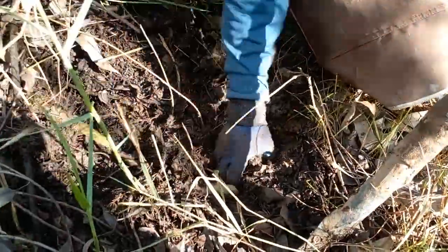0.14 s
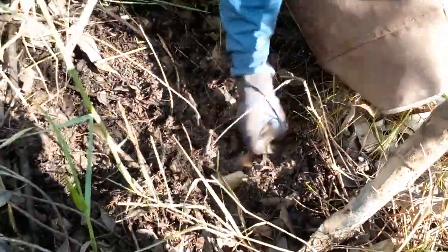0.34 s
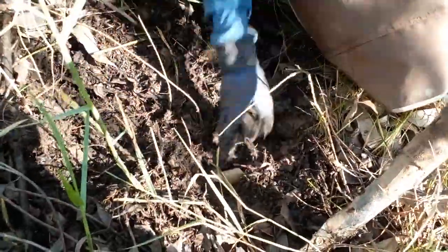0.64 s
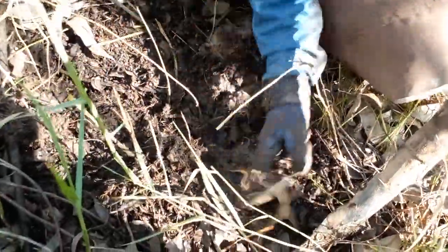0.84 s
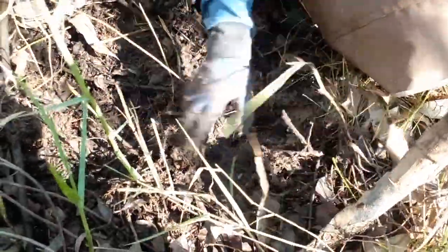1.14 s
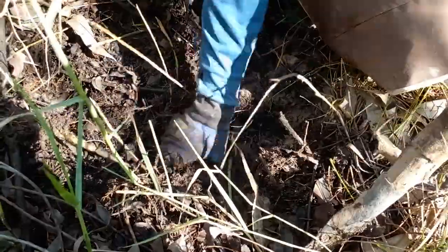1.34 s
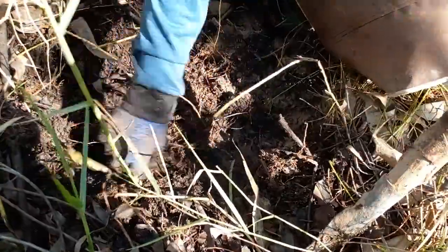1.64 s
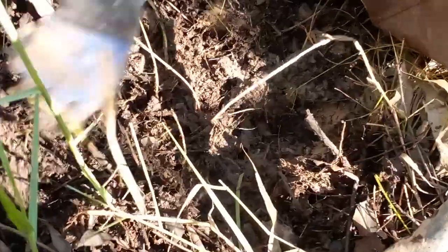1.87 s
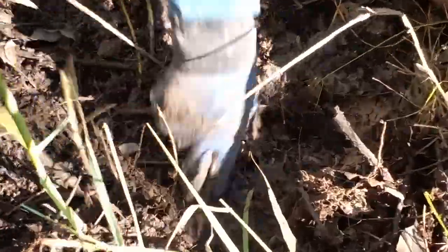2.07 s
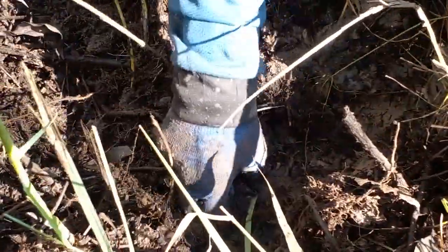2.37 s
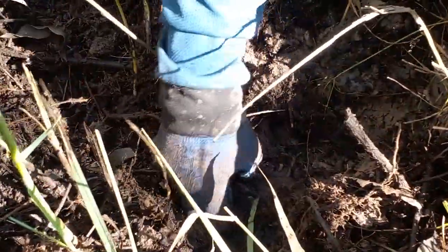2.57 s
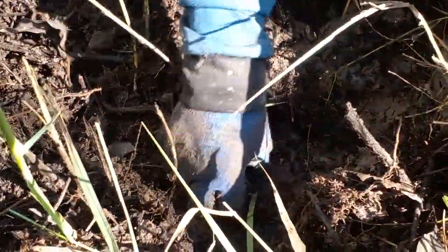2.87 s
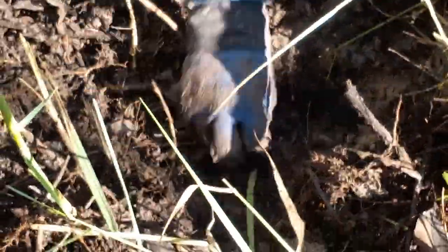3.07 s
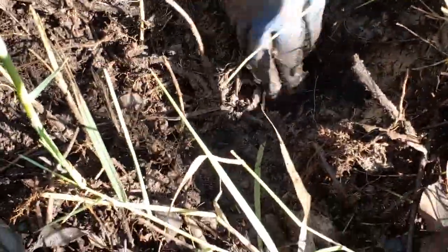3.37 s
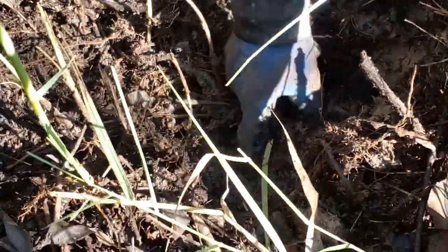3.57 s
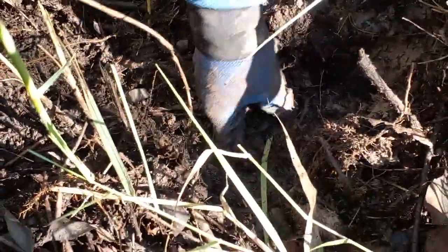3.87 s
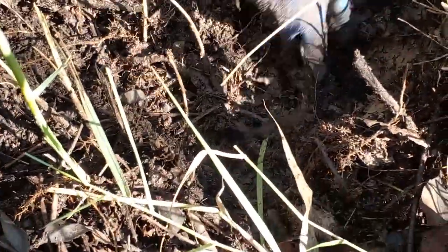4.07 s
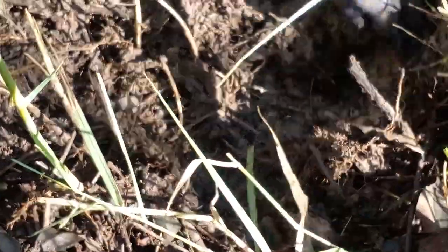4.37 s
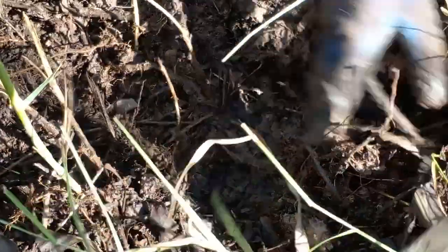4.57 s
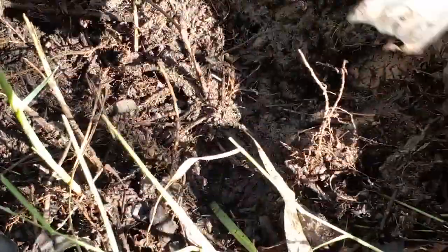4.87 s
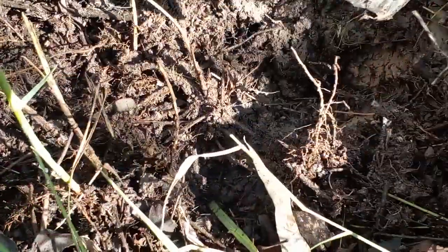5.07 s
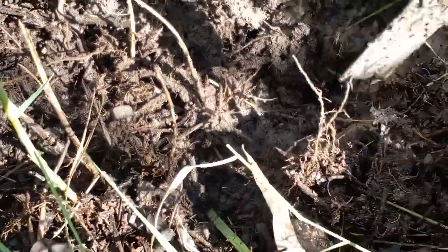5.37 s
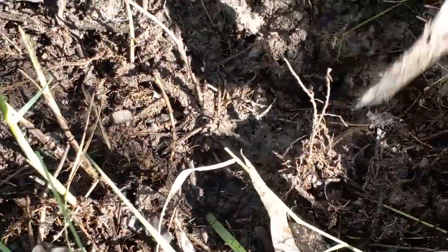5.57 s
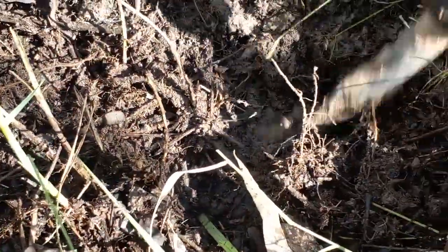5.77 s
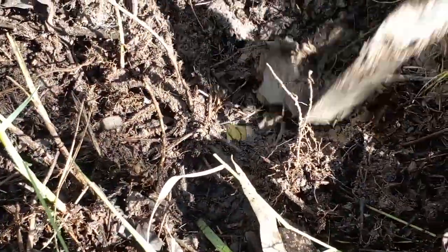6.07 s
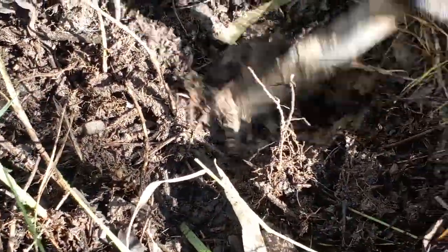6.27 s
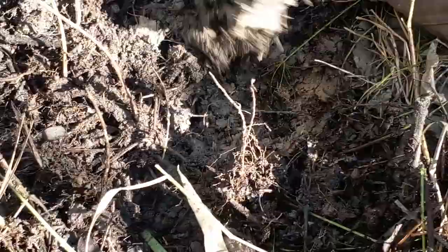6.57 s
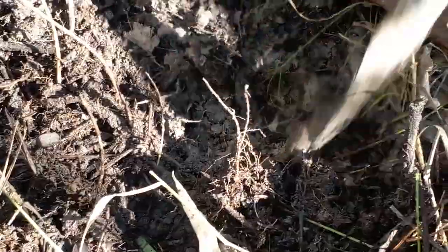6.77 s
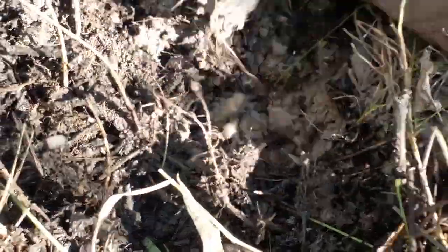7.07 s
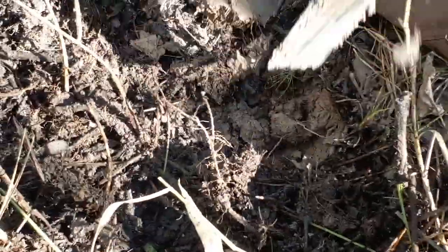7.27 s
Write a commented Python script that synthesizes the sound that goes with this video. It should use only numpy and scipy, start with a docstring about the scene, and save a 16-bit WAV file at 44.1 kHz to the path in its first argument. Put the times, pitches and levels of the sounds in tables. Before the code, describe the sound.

Close gloved digging in dry woodland ground: crunchy rustles, a quiet lull, then harder scraping, twig snaps and dull blade knocks.

```python
"""Dry woodland floor, close up: a gloved hand and a blade dig, with crackling litter, snaps and thuds.
Strokes are noise and dense tiny rings, swelling with effort; snaps are bursts with short modes.
Thuds are decaying low sines with uneven pitch; the blade rings in heavily damped modes.
Behind: a rising bird whistle (swept sine with diffuse tails), shrill insects (wandering sines),
a short low hum (gliding sine with a weak octave) and faint open air (shaped noise)."""
import sys
import numpy as np
from scipy import signal
from scipy.fft import rfft, irfft, next_fast_len
from scipy.io import wavfile
from scipy.ndimage import map_coordinates

SR = 44100
rng = np.random.default_rng(int(sys.argv[2]) if len(sys.argv) > 2 else 0)


def dump_mix(stems):
    """Bounce the given channels to the path in sys.argv[1] as a 16-bit WAV at rate SR."""
    frames = np.atleast_2d(stems).T  # one column per channel
    limited = np.clip(frames, -1, 1)  # hard clip at full scale
    pcm = np.round(limited * 32767).astype(np.int16)
    wavfile.write(sys.argv[1], SR, pcm)


N = 327663

# relative spectrum of soil sounds: freq_hz, density_db_per_hz
SOIL_SPECTRUM = [(100, -23), (250, -17.5), (400, -15.5), (620, -3), (900, -2), (1300, 2), (2200, 2.5),
                 (3000, -1.5), (4500, 4), (9000, -39)]


def amp(db):
    """Decibels to gain."""
    return 10 ** (np.asarray(db) / 20)


def unit(x):
    """Scale x to rms 1."""
    return x / np.sqrt(np.mean(x ** 2) + 1e-20)


def gain(points, hz):
    """Gain of a (Hz, dB) spectrum, interpolated on a log frequency axis."""
    point_hz, point_db = np.transpose(points)
    return amp(np.interp(np.log(hz + 1), np.log(point_hz), point_db))


def wobble(rate):
    """Smooth random curve, rate knots per second."""
    knots = rng.standard_normal(4096)
    return map_coordinates(knots, [np.arange(N) * rate / SR], mode="wrap")


def filtered(x, response):
    """Zero-phase filter: spectrum of x times response(hz)."""
    size = next_fast_len(N + SR // 4)
    return irfft(rfft(x, size) * response(np.fft.rfftfreq(size, 1 / SR)), size)[:N]


def coloured(x, points, size=2048):
    """Minimum-phase filter of unit energy with the given spectrum."""
    cepstrum = irfft(np.log(gain(points, np.fft.rfftfreq(size, 1 / SR))))
    # fold the cepstrum to make the filter causal
    cepstrum[1:size // 2] *= 2
    cepstrum[size // 2 + 1:] = 0
    pulse = irfft(np.exp(rfft(cepstrum)))
    return signal.oaconvolve(x, pulse / np.linalg.norm(pulse))[:N]


def fade(t, t60):
    """Exponential decay, 60 dB down after t60 seconds."""
    return np.exp(-np.log(1000) * t / t60)


def add(track, start_s, sound):
    """Mix a sound into a track from start_s."""
    part = track[max(round(start_s * SR), 0):][:len(sound)]
    part += sound[:len(part)]


def scattered(x, t60, count=4):
    """Diffuse reflections: decaying noise tails whose shares drift."""
    t = np.arange(SR // 3) / SR
    envelope = fade(t, t60) * (1 - fade(t, t60 / 10))
    tails = rng.standard_normal((count, len(t))) * envelope
    tails /= np.linalg.norm(tails, axis=1, keepdims=True)
    shares = np.array([wobble(rate=7) for _ in tails])
    shares /= np.linalg.norm(shares, axis=0)
    reflections = signal.oaconvolve(x[None], tails, axes=1)[:, :N]
    return np.sum(shares * reflections, axis=0)


def woodland():
    """Open air: noise with a faint rumble and hiss, drifting slightly in level."""
    # relative air spectrum: freq_hz, density_db_per_hz
    air_spectrum = [(20, -36), (35, -9), (60, 1), (100, -4), (160, -10), (300, -17), (700, -21.5),
                    (1500, -19), (3000, -19), (5000, -16), (7500, -17.5), (12500, -11), (15500, -19)]
    air = unit(filtered(rng.standard_normal(N), lambda hz: gain(air_spectrum, hz)))
    return amp(-68.0 + 0.29 * wobble(rate=3.52)) * air


def insects():
    """Distant insects: unevenly pulsing sines, each wandering about its own pitch."""
    # one row per insect voice: pitch_hz (centre), level_db
    voices = [(8050, -79.5), (8330, -70), (8480, -75.5), (8700, -89)]
    chorus = np.zeros(N)
    for pitch_hz, level_db in voices:
        hz = pitch_hz + 65 * wobble(rate=20) + 130 * wobble(rate=700)
        pulses = unit(amp(3.5 * wobble(rate=45) + 2 * wobble(rate=12)))
        tone = unit(np.sin(2 * np.pi * np.cumsum(hz) / SR))
        chorus += amp(level_db) * pulses * tone
    return chorus


def effort():
    """Litter dB, soil dB and lumpiness: strokes swell, peak and let go over a faint trickle."""
    # pushes through the ground; levels before the trims in strokes():
    # peak_s, rise_s, release_s, litter_db, soil_db, lumpiness (0 slides, 1 crumbles)
    pushes = [(.06, 0.3, 0.12, -49, -60, 0.72), (.275, 0.068, 0.18, -58, -66.5, 1),
              (0.429, 0.018, 0.035, -54.5, -63, 0.91), (.495, 0.042, 0.038, -53.5, -66.5, .5),
              (0.727, 0.019, 0.026, -52, -65, .8), (0.777, 0.023, .018, -47.5, -54.5, 1),
              (0.834, 0.045, .03, -49.5, -51.5, 1), (.885, 0.045, 0.047, -40, -52.5, 0.88),
              (.942, 0.051, 0.051, -37, -49.5, 0.76), (1.027, 0.02, 0.014, -37, -53, 0.69),
              (1.06, .02, 0.051, -53.5, -63.5, 0.85), (1.165, 0.051, 0.091, -54, -67, 0.92),
              (1.33, 0.091, 0.11, -61, -69, 0.75), (1.46, 0.083, 0.13, -58, -64.5, 0.92),
              (1.72, 0.094, 0.19, -59, -69.5, 0.67), (2.01, 0.09, .06, -64, -90, 0.95),
              (2.17, 0.08, 0.1, -59.5, -72.5, 0.4), (2.39, 0.029, 0.072, -59, -76, 0.98),
              (2.56, .05, 0.046, -58.5, -68, .8), (2.73, .12, 0.13, -64.5, -78, 0.72),
              (3.14, 0.1, 0.082, -66, -75, 0.86), (3.29, 0.028, 0.028, -67, -68.5, 1),
              (3.335, 0.019, 0.062, -61, -73, 0.65), (3.56, 0.051, 0.045, -71, -88, 0.88),
              (3.83, 0.088, 0.094, -58.5, -76, 0.96), (3.999, 0.063, 0.072, -60, -78.5, .6),
              (4.357, 0.075, 0.029, -42.5, -51, 0.18), (4.454, 0.024, 0.044, -43.5, -55, 0.28),
              (4.51, 0.031, 0.031, -40.5, -56, 0.55), (4.57, 0.063, .06, -55.5, -61.5, 0.45),
              (4.717, 0.049, .04, -30.5, -41.5, 0.37), (4.87, 0.1, 0.12, -44.5, -58.5, 0.54),
              (5.037, 0.16, 0.11, -39, -49, 0.66), (5.285, 0.02, 0.042, -52.5, -56, 1),
              (5.442, 0.15, 0.11, -46.5, -56, 0.33), (5.646, 0.022, 0.094, -47.5, -56.5, 0.68),
              (5.78, 0.026, .07, -56.5, -65, 0.41), (5.852, 0.008, 0.076, -50, -62.5, 0.65),
              (5.934, 0.011, 0.011, -48.5, -61, .7), (5.99, 0.051, 0.085, -58.5, -70.5, 0.66),
              (6.185, 0.0095, 0.024, -44.5, -57, .8), (6.269, 0.057, 0.041, -44.5, -53, .8),
              (6.365, 0.083, 0.054, -48, -59.5, 0.9), (6.55, 0.13, .11, -52.5, -62, 0.74),
              (6.8, 0.011, 0.034, -36.5, -44.5, 0.73), (6.847, .025, 0.035, -46.5, -53, 0.96),
              (6.96, 0.078, 0.033, -53.5, -58.5, 0.88), (7.022, .03, 0.063, -48, -59, 0.67),
              (7.189, 0.084, 0.12, -56, -63, 0.82), (7.359, 0.035, 0.033, -52, -64.5, 0.56),
              (7.415, 0.011, 0.03, -44.5, -50.5, 0.44)]
    settling_db, settling_lumpiness = (-69.5, -92), .9  # steady trickle of litter and soil
    swell_db, swell_shape = 9, 1.5  # drop at one rise or release time; shape 1 = pointed, 2 = rounded
    t = np.arange(N) / SR
    power = amp(settling_db)[:, None] ** 2 * np.ones(N)
    lumpy = settling_lumpiness * power[0]
    for peak_s, rise_s, release_s, litter_db, soil_db, lumpiness in pushes:
        near = slice(*np.searchsorted(t, [peak_s - 3 * rise_s, peak_s + 3 * release_s]))
        away = np.maximum((peak_s - t[near]) / rise_s, (t[near] - peak_s) / release_s)
        peak_db = np.array([[litter_db], [soil_db]])
        swell = amp(peak_db - swell_db * away ** swell_shape) ** 2
        power[:, near] += swell
        lumpy[near] += lumpiness * swell[0]
    litter_level_db, soil_level_db = 10 * np.log10(power)
    return litter_level_db, soil_level_db, np.clip(lumpy / power[0], 0, 1)


def grains(rate, spread_db, low_hz, high_hz, cycles, size=96):
    """Tiny fractures, rate per second: damped rings of random pitch and strength, rms 1 overall."""
    at = np.flatnonzero(rng.random(N) < rate / SR)
    pitch, strength, life, phase = rng.random((N, 4))[at].T[:, :, None]
    turns = low_hz * (high_hz / low_hz) ** pitch * np.arange(size) / SR
    rings = np.cos(2 * np.pi * (turns + phase)) * np.exp(-turns / (cycles * (.5 + life)))
    rings *= amp(-spread_db * np.log(1 - .97 * strength)) / np.linalg.norm(rings, axis=1, keepdims=True)
    places = (at[:, None] + np.arange(size)).ravel()
    train = np.bincount(places, rings.ravel(), N + size)[:N]
    return unit(train / np.sqrt(rate))  # level independent of density


def collapses(rate, t60, spread_db):
    """Power of clods giving way at once and trickling out, rate per second; mean 1."""
    starts = (rng.random(N) < rate / SR) * amp(2 * spread_db * (2 * rng.random(N) - 1))
    trickle = fade(np.arange(SR // 10) / SR, t60) ** 2
    power = np.abs(signal.oaconvolve(starts, trickle)[:N])
    return power / power.mean()


def strokes(litter_db, soil_db, lumpiness):
    """Harder strokes break more crumbs a second; the soil gives way in uneven clumps."""
    # relative spectra: freq_hz, density_db_per_hz
    litter_spectrum = [(1200, -54.5), (2500, -12), (3400, -16.5), (5000, -10), (6200, -3.5), (7500, 0),
                       (9800, -2.5), (12500, 1), (14000, -2), (15800, -14)]
    rustle_spectrum = [(300, -23.5), (700, -12.5), (1100, -5.5), (1800, -0.5), (2400, -2), (3200, -6.5),
                       (5000, -3), (9000, -37)]
    # soil level where the deep layer starts, its range, and how much sooner lumps reach it
    deep_from_db, deep_over_db, lumps_deepen_db = -64, 19.5, 10
    rate = np.minimum(1700 * amp(.5 * (litter_db + 55.5)), SR / 6)

    # some collapses shake litter and soil together, others only one of them
    shared = 1 - .8 * lumpiness + .4 * lumpiness * collapses(rate=130, t60=.028, spread_db=4.5)
    leaves = np.sqrt(shared + .4 * lumpiness * collapses(rate=90, t60=.04, spread_db=4.5))
    clods = np.sqrt(shared + .4 * lumpiness * collapses(rate=60, t60=.035, spread_db=5))

    crackle = grains(rate, spread_db=1.5, low_hz=2700, high_hz=14300, cycles=1.95)
    crackle += 0.95 * rng.standard_normal(N)
    crumble = grains(rate / 2, spread_db=-1.0, low_hz=471, high_hz=3360, cycles=0.97)
    crumble += 2.03 * rng.standard_normal(N)
    brushing = grains(rate, spread_db=-1, low_hz=840, high_hz=4000, cycles=1.0)
    brushing += rng.standard_normal(N)

    # a light touch rustles the surface; pressing in stirs the deeper soil
    depth = np.clip((soil_db + lumps_deepen_db * lumpiness - deep_from_db) / deep_over_db, 0, 1)
    deep = np.sqrt(depth) * unit(coloured(crumble, SOIL_SPECTRUM))
    light = np.sqrt(1 - depth) * unit(coloured(brushing, rustle_spectrum))
    litter = amp(litter_db - 0.25) * leaves * unit(coloured(crackle, litter_spectrum))
    soil = amp(soil_db + 1.13) * clods * (deep + light)
    return litter + soil


def grit(litter_db, soil_db, lumpiness):
    """Chance ticks, more in lumpy ground, louder under hard strokes: start_s, crack_db, knock_db."""
    ticks_per_s, spread_db = 13, 2  # rate in fully lumpy ground; scatter in strength
    at = np.flatnonzero(rng.random(N) < ticks_per_s * lumpiness / SR)
    crack_spread_db, knock_spread_db = spread_db * rng.standard_normal((N, 2))[at].T
    crack_db = litter_db[at] + 4.5 + crack_spread_db
    knock_db = soil_db[at] + knock_spread_db
    return np.column_stack([at / SR, crack_db, knock_db])


def fracture(low_hz, high_hz, ring_t60, burst_t60, splinter_db, splinter_t60, count=9):
    """One break: sudden burst, short modes of the broken piece, then splinters."""
    t = np.arange(SR // 20) / SR
    position, phase = rng.random((2, count, 1))
    mode_hz = low_hz + (high_hz - low_hz) * position
    modes = np.sin(2 * np.pi * (mode_hz * t + phase)).sum(0)
    burst = fade(t, burst_t60) + amp(splinter_db) * fade(t, splinter_t60)
    sound = 0.83 * unit(modes) * fade(t, ring_t60) + burst * rng.standard_normal(len(t))
    return sound / np.linalg.norm(sound) * np.sqrt(.004 * SR)  # energy of rms 1 over 4 ms


def snaps(ticks):
    """Twigs, roots and grit: each break gives a bright crack and a duller knock into the soil."""
    # twigs and roots giving way; levels before the trims below: start_s, crack_db, knock_db
    breaks = [(.057, -47, -50.5), (.0784, -44, -66), (.136, -45, -60), (.275, -44.5, -55), (.351, -50, -67),
              (.3846, -60, -51.5), (.7798, -39, -50), (.8273, -39, -63), (.832, -51, -49),
              (.8703, -39, -60), (.8901, -34.5, -64), (.9051, -37, -60), (1.2711, -44, -59),
              (1.4329, -46, -74), (1.5042, -65, -62), (1.6923, -46, -63), (1.721, -51, -64),
              (2.5284, -52.5, -66), (2.5624, -52, -57), (3.264, -53, -62), (3.2922, -55, -55),
              (4.7116, -29, -42), (4.9857, -29, -55.5), (5.0849, -43, -57), (5.1297, -40, -50),
              (5.2093, -48, -47), (5.273, -43.5, -49), (5.3659, -42, -46.5), (5.6167, -43.5, -54),
              (5.6489, -45, -50), (5.6753, -49, -50.5), (5.7046, -35, -44), (5.7123, -40.5, -44.5),
              (5.8477, -48, -70.5), (5.8806, -44, -66), (5.9244, -44, -55.5), (6.0237, -50, -60),
              (6.0641, -45.5, -66), (6.077, -46.5, -57.5), (6.2262, -37.5, -56), (6.283, -43, -50),
              (6.3923, -42.5, -56), (6.5482, -45.5, -52), (6.7947, -27, -34.5), (6.8086, -40, -31.5),
              (6.9684, -38.5, -41), (7.1054, -48, -55), (7.3227, -43, -52), (7.4054, -41, -52),
              (7.411, -17.5, -41)]
    # relative spectrum of the crack: freq_hz, density_db_per_hz
    crack_spectrum = [(800, -37.5), (2000, -16), (3500, -13.5), (5000, -8), (6200, -1), (8000, -1),
                      (9800, -7), (12000, 0), (14000, -5.5), (16000, -27)]
    cracks, knocks = np.zeros((2, N))
    for start_s, crack_db, knock_db in [*breaks, *ticks]:
        crack = fracture(3500, 12000, ring_t60=.0042, burst_t60=.005, splinter_db=-13, splinter_t60=.02)
        knock = fracture(600, 3000, ring_t60=.008, burst_t60=.008, splinter_db=-15, splinter_t60=.03)
        add(cracks, start_s, amp(crack_db - 1.46) * crack)
        add(knocks, start_s, amp(knock_db - 3.5) * knock)
    return coloured(cracks, crack_spectrum) + coloured(knocks, SOIL_SPECTRUM)


def bird():
    """Rising whistle: a sine fluttering in pitch and strength, smeared by the trees."""
    # whistles, level before contour, flutter and mix: start_s, length_s, level_db
    calls = [(0.238, 0.14, -60), (1.013, .145, -58), (1.907, 0.15, -59), (4.165, 0.13, -60.5),
             (5.155, 0.17, -57)]
    # contour of one whistle: share_of_length, pitch_hz, relative_level_db
    contour = [(0, 3950, -2.5), (0.249, 4573, -4.5), (0.652, 5300, 1.5), (.85, 5920, 1), (1, 6940, 1)]
    song = np.zeros(N)
    share, pitch_hz, contour_db = np.transpose(contour)
    for start_s, length_s, level_db in calls:
        u = np.linspace(0, 1, int(length_s * SR))
        flutter = 1 + .011 * wobble(rate=300)[:len(u)]
        hz = np.interp(u, share, pitch_hz) * flutter
        tone = np.sin(2 * np.pi * np.cumsum(hz) / SR)
        level = amp(level_db + np.interp(u, share, contour_db))
        add(song, start_s, level * tone * signal.windows.tukey(len(u), .1))
    song = song * amp(3.2 * wobble(rate=130))
    trunks = scattered(song, t60=0.027)
    canopy = scattered(song, t60=0.41)
    return .6 * song + .5 * trunks + .65 * canopy


def thuds():
    """Loose earth takes a blow: a dull decaying push of a few uneven cycles."""
    # clods and shoves, level before the attack: start_s, pitch_hz (centre), level_db, t60_s
    impacts = [(.93, 149.7, -64, 0.11), (4.7, 147, -64, 0.099), (5.03, 89.4, -62, .3),
               (5.291, 151, -65, 0.089), (5.668, 111.6, -54, 0.26), (5.702, 129, -46, 0.058),
               (5.734, 84.5, -57.5, 0.17), (6.188, 111, -60, .12), (6.232, 71, -62, 0.33),
               (6.822, 133, -50.5, 0.19), (6.856, 84, -61, 0.16)]
    track, t = np.zeros(N), np.arange(SR // 3) / SR
    for start_s, pitch_hz, level_db, t60_s in impacts:
        turns = np.cumsum(pitch_hz * (1 + .2 * wobble(rate=120)[:len(t)])) / SR
        envelope = fade(t, t60_s) * (1 - fade(t, 0.01))
        add(track, start_s, amp(level_db) * envelope * np.sin(2 * np.pi * turns))
    return track


def blade():
    """Blows on firm ground ring the blade at new mode strengths; the soil damps it fast."""
    # knocks of the blade, level before mode levels and attack: start_s, level_db
    blows = [(0.931, -49), (4.729, -66), (5.296, -65), (5.712, -52), (6.391, -57), (6.794, -39.5),
             (6.807, -37.5)]
    # modes of the blade in the soil: freq_hz, relative_level_db, t60_s
    mode_table = [(273.6, -13.5, 0.116), (504, -4.5, 0.031), (640, -6.5, 0.055), (735, 1, 0.034),
                  (1264, -16, .02), (1550, -3, 0.045), (2040, -8, 0.02)]
    track, t = np.zeros(N), np.arange(SR // 4) / SR
    mode_hz, mode_db, t60_s = np.transpose(mode_table)[:, :, None]
    for start_s, level_db in blows:
        strength, phase = rng.standard_normal((2, len(mode_table), 1))
        level = amp(level_db + mode_db + 1.3 * strength)
        modes = level * fade(t, t60_s) * np.sin(2 * np.pi * (mode_hz * t + phase))
        add(track, start_s, modes.sum(0) * (1 - fade(t, 0.0041)))
    return track


def hum():
    """Short low hum: a sine gliding in pitch and level, with a weak octave."""
    # hum contour: time_s, pitch_hz, level_db (fundamental)
    contour = [(1.95, 88, -100), (2.04, 83.5, -67), (2.13, 84, -61), (2.2, 82.3, -56.5), (2.26, 76, -69),
               (2.33, 77, -65.5), (2.42, 73.6, -100)]
    time_s, point_hz, point_db = np.transpose(contour)
    t = np.arange(N) / SR
    pitch_hz = np.interp(t, time_s, point_hz)
    level_db = np.interp(t, time_s, point_db)
    phase = 2 * np.pi * np.cumsum(pitch_hz) / SR
    return amp(level_db) * (np.sin(phase) + amp(-30) * np.sin(2 * phase))


def scene():
    """Close digging with a little scatter from the ground and stems, in the open wood."""
    ground = effort()
    digging = strokes(*ground) + snaps(grit(*ground)) + thuds() + blade()
    stems = amp(-19) * scattered(digging, t60=.05, count=8)
    background = woodland() + insects() + bird() + hum()
    return (digging + stems + background)[None]


def record(dry):
    """Steep zero-phase low-pass, 3 dB down at the band limit."""
    top_hz = 16000

    def low_pass(hz):
        return 1 / np.sqrt(1 + (hz / top_hz) ** 160)

    return np.array([filtered(channel, low_pass) for channel in dry])


dry = scene()
out = record(dry)
dump_mix(out)
```